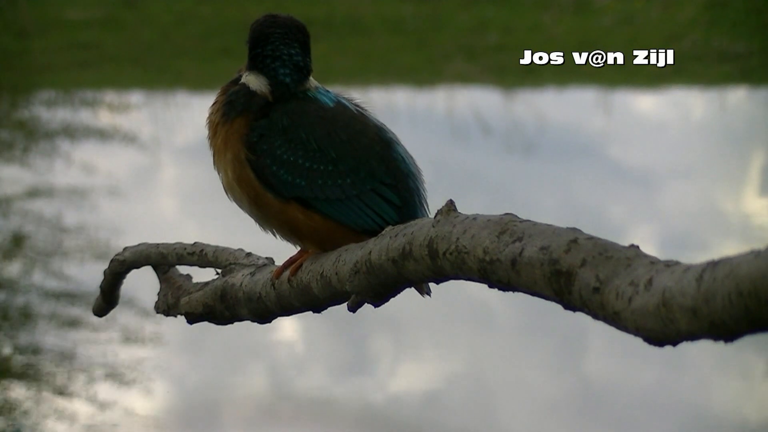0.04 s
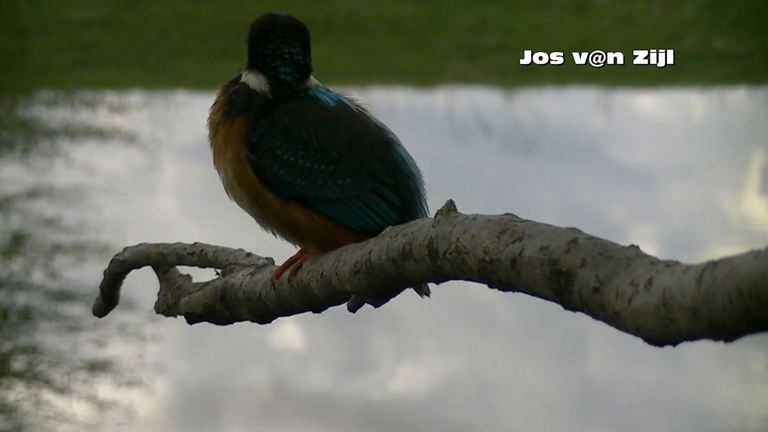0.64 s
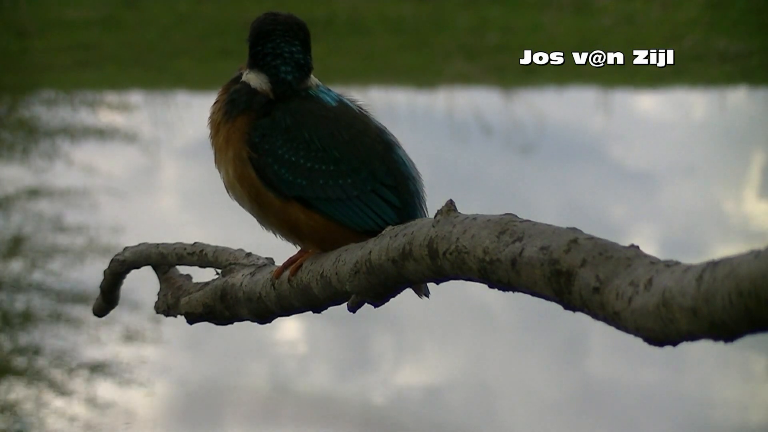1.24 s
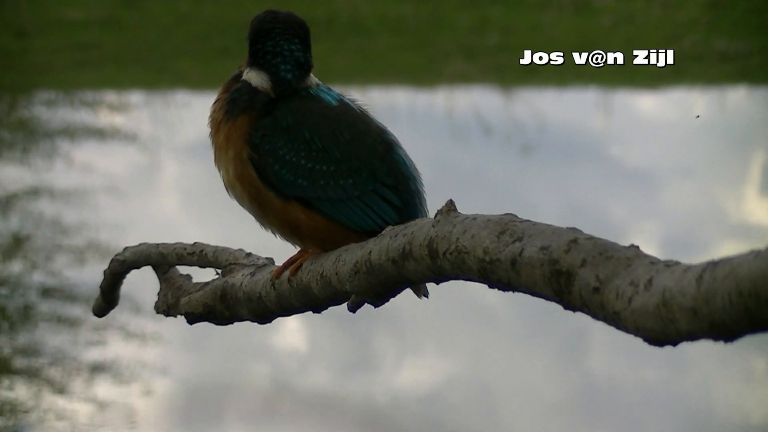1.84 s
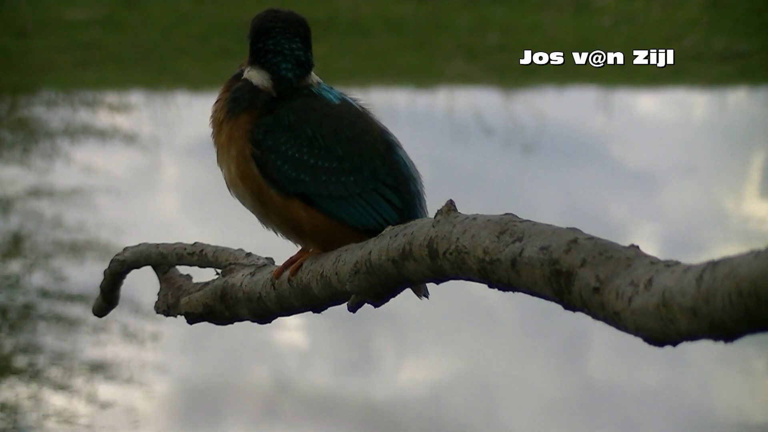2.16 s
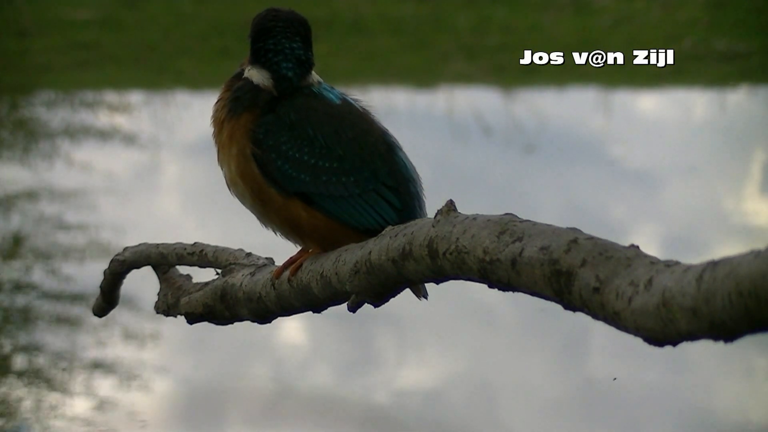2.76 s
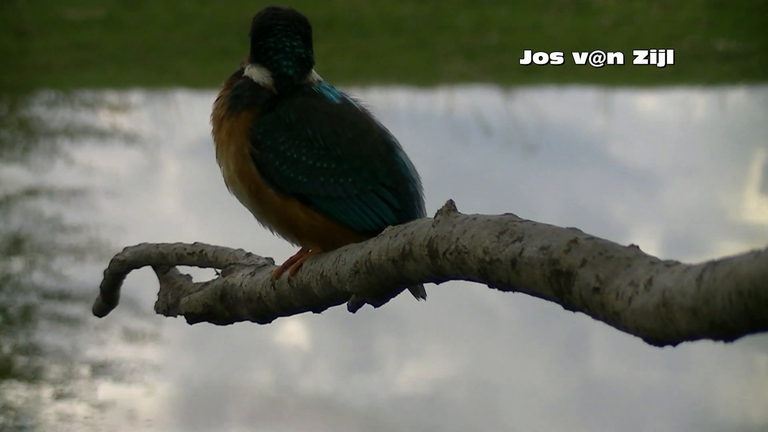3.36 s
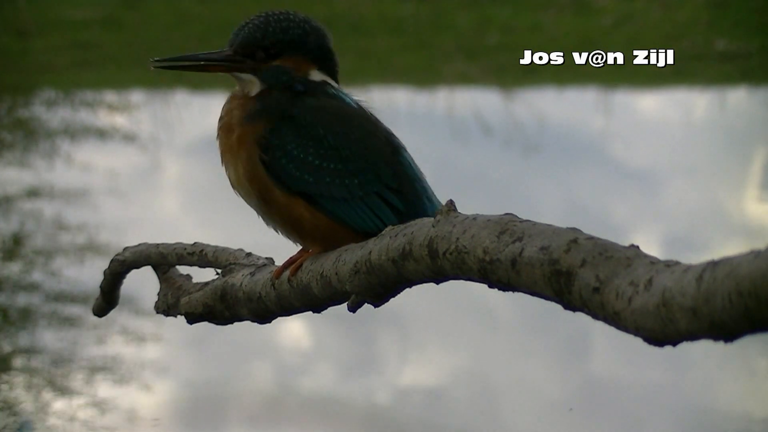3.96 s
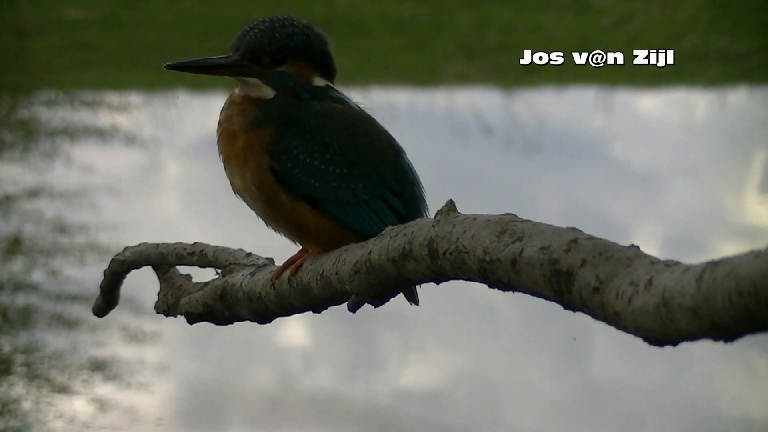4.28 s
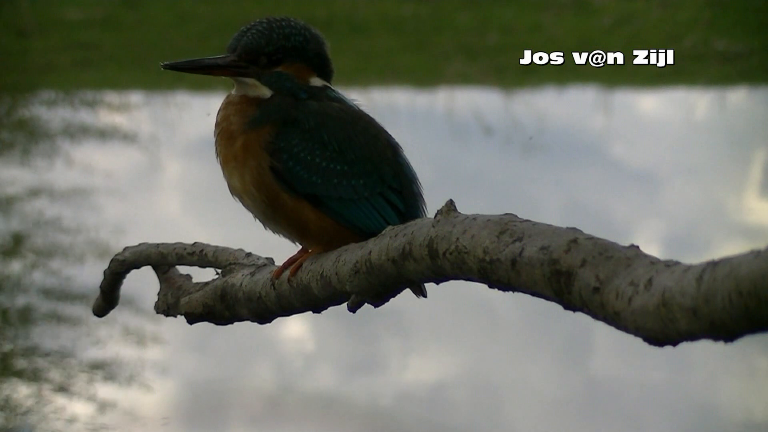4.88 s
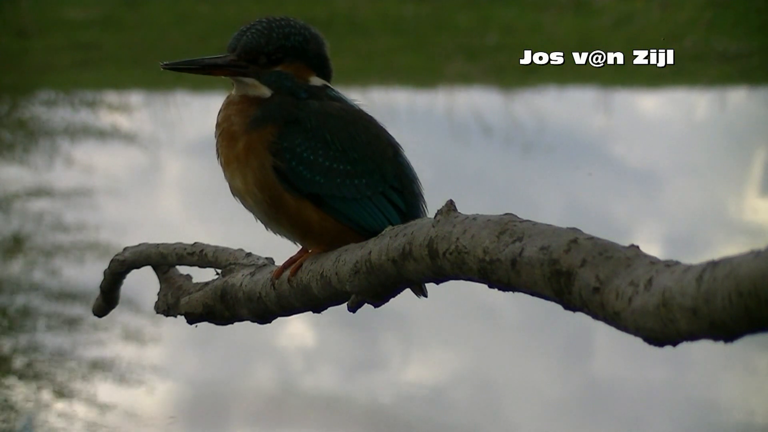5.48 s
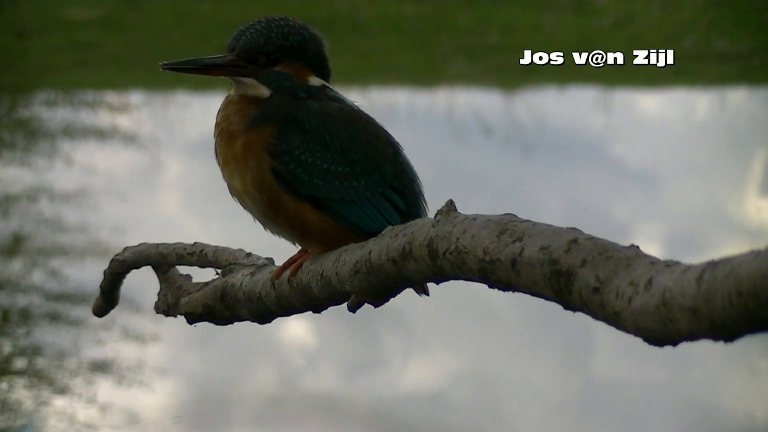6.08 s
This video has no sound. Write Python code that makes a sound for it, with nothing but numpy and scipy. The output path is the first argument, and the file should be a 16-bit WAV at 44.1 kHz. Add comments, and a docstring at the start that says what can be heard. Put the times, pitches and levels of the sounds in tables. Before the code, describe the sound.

A nearby kingfisher gives two thin whistles and one sharp chip over a soft outdoor rush, with faint birds far off.

```python
"""A steady rush of open country, the faint tail of a kingfisher call, and small birds piping far off.
By a pond the kingfisher gives two thin, falling whistles, between which a distant bird of prey mews
once, and then one sharp, loud chip. Each call is a gliding, nearly pure tone, the vibration of a membrane
in the bird's syrinx, and scattering from the bank and the trees gives it a short tail.
The rush is broadband noise."""
import sys
import numpy as np
from scipy import signal
from scipy.fft import rfft, irfft
from scipy.io import wavfile
from scipy.ndimage import uniform_filter1d

SR = 44100
rng = np.random.default_rng(int(sys.argv[2]) if len(sys.argv) > 2 else 0)


def transcribe(u):
    """Save the signal u as a 16-bit wav file named by the first command-line argument.

    u: samples, shape (n,) or (channels, n), limited to [-1, 1]; the rate is SR.
    q: integer samples, one column per channel.
    """
    v = np.clip(np.atleast_2d(u).T, -1, 1)
    q = np.round(v * 32767).astype(np.int16)
    wavfile.write(sys.argv[1], SR, q)


N = 270333
TIME = np.arange(N) / SR


def undb(db):
    """The decibel scale: a level as an amplitude ratio."""
    return 10 ** (np.asarray(db) / 20)


def unit_rms(x):
    """Normalisation to an rms of 1."""
    return x / np.sqrt(np.mean(x ** 2))


def drift(rate_hz):
    """Random modulation: values held for 1 / rate_hz seconds and smoothed twice, with an rms of 1."""
    hold = max(int(SR / rate_hz), 1)
    steps = np.repeat(rng.standard_normal(N // hold + 1), hold)
    return unit_rms(uniform_filter1d(uniform_filter1d(steps, hold), hold)[:N])


def gate(t, length_s, attack_s, release_s):
    """A trapezoidal envelope: linear attack, hold and linear release."""
    return np.clip(t / attack_s, 0, 1) * np.clip((length_s - t) / release_s, 0, 1)


def gain_at(points, hz):
    """A frequency response: (frequency [Hz], level [dB]) points joined on a logarithmic axis."""
    point_hz, db = np.transpose(points)
    return undb(np.interp(np.log(hz + 1), np.log(point_hz), db))


def stereo(mid, side):
    """Sum and difference: mid and side become left and right."""
    return np.array([mid + side, mid - side])


def place(x, pan_db):
    """Direction by level difference: the left is pan_db louder than the right."""
    return x * undb(np.array([[pan_db], [-pan_db]]) / 2)


# Spectrum of the rush: (frequency [Hz], relative spectral density [dB])
RUSH_SPECTRUM = [(24, -82), (40, -47), (154, -21), (187, -13.5), (245, -12.5), (291, -5.5), (329, -9.5),
                 (452, -3), (499, -4), (776, -1), (921, -1), (1090, -1.5), (1870, -6.5), (4530, -12),
                 (14000, -28.5)]
# Stereo width of the rush: (frequency [Hz], side level relative to mid [dB])
RUSH_WIDTH = [(60, 0.5), (110, -2.5), (200, -11.5), (370, -8), (670, -6.5), (1220, -6.5), (2220, -4.5),
              (4060, -8), (7410, -10.5), (13500, -23.5)]
# Swells of its middle register: (crest time [s], time constant [s], boost [dB])
RUSH_SWELLS = [(2.92, .15, 1.1), (5.07, .2, 3.6)]


def open_air():
    """Spectrally shaped noise: a soft rush, narrower in the treble, whose middle register swells."""
    hz = np.arange(N // 2 + 1) * SR / N
    colour = gain_at(RUSH_SPECTRUM, hz)
    mid, side = (unit_rms(irfft(rfft(rng.standard_normal(N)) * colour, N)) for _ in range(2))
    side = irfft(rfft(side) * gain_at(RUSH_WIDTH, hz), N)
    rush = undb(-63) * stereo(mid, side)
    centre_hz, spread_octaves = 845, .89
    band = np.exp(-.5 * (np.log2((hz + 1) / centre_hz) / spread_octaves) ** 2)
    middle_register = irfft(rfft(rush) * band, N)
    swell_db = sum(db * np.exp(-np.abs(TIME - crest) / width) for crest, width, db in RUSH_SWELLS)
    return rush + (undb(swell_db + .3 * drift(6)) - 1) * middle_register


# The faint tail of a kingfisher call, then notes of small, distant birds:
# (time [s], duration [s], start pitch [Hz], middle pitch [Hz], end pitch [Hz], level [dB])
FAINT_NOTES = [(0.0, .05, 5730, 5810, 5820, -67.5), (0.248, .06, 2200, 2080, 2000, -71),
               (0.316, 0.11, 2130, 2225, 2030, -67), (0.722, .26, 3020, 3070, 2950, -76.5),
               (2.579, .11, 2570, 2130, 1990, -71), (3.73, .06, 4500, 4470, 4430, -80),
               (4.41, 0.064, 4500, 4460, 4440, -76.5), (5.06, .09, 4470, 4460, 4430, -77.5),
               (5.76, 0.055, 4440, 4450, 4470, -72.5)]


def faint_calls():
    """Frequency modulation: faint sines follow unsteady parabolas of pitch, blurred by the trees."""
    notes = np.zeros(N)
    unsteady = 1 + .008 * drift(300)
    for start, length, first_hz, middle_hz, last_hz, db in FAINT_NOTES:
        progress = np.clip((TIME - start) / length, 0, 1)
        parabola = np.polyfit([0, .5, 1], [first_hz, middle_hz, last_hz], 2)
        hz = unsteady * np.polyval(parabola, progress)
        envelope = undb(db) * np.sqrt(2 * np.abs(np.sin(np.pi * progress)))
        notes += envelope * np.sin(2 * np.pi * np.cumsum(hz) / SR)
    return notes + scatter(notes, t60_s=.4, wet_db=-7, side_db=-6.5, delay_s=.008)


def scatter(x, t60_s, wet_db, side_db, delay_s):
    """Diffuse reflection: countless small echoes off leaves and ground arrive in clumps and decay."""
    t = TIME[:SR]
    clumps = undb(2.5 * drift(160)[:SR])
    onset = np.clip(t / delay_s - 1, 0, 1)
    envelope = onset * undb(-60 * t / t60_s) * clumps
    mid, side = rng.standard_normal((2, SR)) * envelope / np.sqrt(np.sum(envelope ** 2))
    absorption = signal.butter(1, 9000, fs=SR, output="sos")  # leaves and air absorb the treble
    echoes = signal.sosfilt(absorption, stereo(mid, undb(side_db) * side))
    return undb(wet_db) * signal.fftconvolve(x[None], echoes, axes=1)[:, :N]


def syrinx(hz, fundamental_rms, octave_rms, waver, flutter_db):
    """Membrane vibration: a gliding fundamental and its octave, slightly unsteady in pitch and level."""
    phase = 2 * np.pi * np.cumsum(hz * (1 + waver * drift(700))) / SR
    partials = fundamental_rms * np.sin(phase) + octave_rms * np.sin(2 * phase)
    return np.sqrt(2) * undb(flutter_db * drift(400)) * partials


def beak(x):
    """Radiation from a small source: the tiny throat and beak let out only the treble."""
    return signal.sosfilt(signal.butter(3, 3594, "high", fs=SR, output="sos"), x)


# The kingfisher's whistles at the syrinx:
# (time [s], duration [s], time to break [s], high pitch [Hz], high level [dB], low pitch [Hz],
#  low level [dB], sag [Hz], sag exponent [1], octave level [dB])
WHISTLE_NOTES = [(1.092, 0.078, 0.031, 5983, -31, 5583, -31.5, 400, 1.7, -78),
                 (3.0126, .082, 0.012, 5916, -35.5, 5590, -31, 466, 4.1, -71.5)]


def kingfisher_whistles():
    """A register break: each high note jumps to a lower one, which sags and weakens."""
    voice = np.zeros(N)
    attack_s, release_s, transition_s = .0039, .0024, .0028
    dip_db, sag_db_per_hz = -7, -.0305
    for note in WHISTLE_NOTES:
        start, length, break_s, high_hz, high_db, low_hz, low_db, sag_hz, sag_power, octave_db = note
        t = np.clip(TIME - start, 0, length)
        turn = np.tanh((t - break_s) / transition_s)
        low_share = (1 + turn) / 2
        drop_hz = sag_hz * np.clip((t - break_s) / (length - break_s), 0, 1) ** sag_power
        hz = high_hz + low_share * (low_hz - high_hz) - drop_hz
        falter_db = dip_db * (1 - turn ** 2)  # the voice falters as it changes note
        db = high_db + low_share * (low_db - high_db) + falter_db + sag_db_per_hz * drop_hz
        effort = (1 - np.exp(-t / attack_s)) * np.clip((length - t) / release_s, 0, 1)
        voice += syrinx(hz, effort * undb(db), effort * undb(octave_db), waver=.0015, flutter_db=1)
    return beak(voice)


def bird_of_prey():
    """Damped vibrato on a glide: a far mew scoops up, then sinks and fades, its octave the louder part."""
    start_s, length_s, rise_s = 2.075, .52, .055
    start_hz, crest_hz, fall_hz_per_s = 980, 1343, 900
    quaver_hz, depth_hz, damping_s = 8.4, 55.1, .25
    t = np.clip(TIME - start_s, 0, length_s)
    scoop = np.clip(1 - t / rise_s, 0, 1) ** 2
    sinking_s = np.maximum(t - rise_s, 0)
    quaver = depth_hz * np.exp(-sinking_s / damping_s) * np.cos(2 * np.pi * quaver_hz * (t - rise_s))
    hz = crest_hz + scoop * (start_hz - crest_hz) - fall_hz_per_s * sinking_s + quaver
    effort = gate(t, length_s, attack_s=.025, release_s=.02)
    fundamental = effort * undb(-63 - 35 * sinking_s)
    octave = effort * undb(-60 - 21.5 * sinking_s)
    mew = syrinx(hz, fundamental, octave, waver=.0061, flutter_db=1.3)
    return place(mew, pan_db=2) + scatter(mew, t60_s=.32, wet_db=-12, side_db=-7, delay_s=.0089)


def kingfisher_chip():
    """Quadratic nonlinearity: one steep arch of pitch whose octave grows as the square of the effort."""
    start_s, length_s, rise_s = 4.1473, .037, .0082
    crest_hz, fall_hz_per_s, fade_db_per_hz = 6380, 87300, -.0051
    t = np.clip(TIME - start_s, 0, length_s)
    past_crest = t / rise_s - 1
    drop_hz = fall_hz_per_s * rise_s * (past_crest + np.exp(-past_crest) - 1)
    flick_hz = 900 * np.exp(-t / .00028)  # the pitch snaps up from below
    hz = crest_hz - drop_hz - flick_hz
    burst_db = 3.5 * np.exp(-t / .002)  # the onset is a little louder than the hold
    fade_db = fade_db_per_hz * drop_hz * (past_crest > 0)
    effort = gate(t, length_s, attack_s=.0006, release_s=.003) * undb(burst_db + fade_db)
    voice = syrinx(hz, effort, undb(-21) * effort ** 2, waver=.0013, flutter_db=.1)
    return beak(undb(-16.5) * voice)


def kingfisher_by_pond():
    """Direct and reflected sound: the near bank answers the calls quickly and the trees linger."""
    whistles, chip = kingfisher_whistles(), kingfisher_chip()
    # Directivity: the whistles face the listener, so less reaches the bank; the chip is aimed aside.
    bank = scatter(chip + undb(-2) * whistles, t60_s=.2, wet_db=-12.5, side_db=-13, delay_s=.0061)
    trees = scatter(chip + whistles, t60_s=.65, wet_db=-35, side_db=-12.5, delay_s=.03)
    return place(whistles, pan_db=4) + place(chip, pan_db=1) + bank + trees


def scene():
    """Superposition: the pressures of the rush and of the near and far birds add."""
    return place(open_air(), pan_db=-.4) + faint_calls() + kingfisher_by_pond() + bird_of_prey()


def record(dry):
    """Band limiting: a steep low-pass filter removes the highest treble."""
    cutoff_hz = 14200
    return signal.sosfilt(signal.ellip(10, .1, 70, cutoff_hz, fs=SR, output="sos"), dry)


dry = scene()
out = record(dry)
transcribe(out)
```